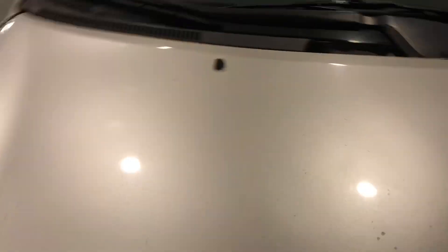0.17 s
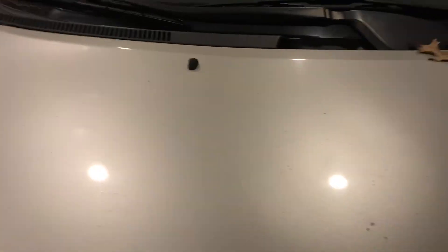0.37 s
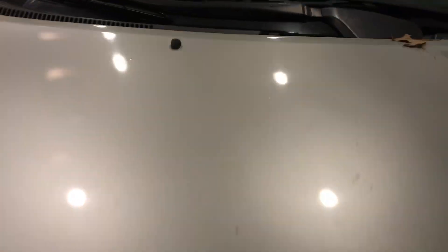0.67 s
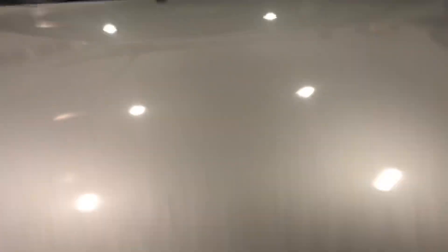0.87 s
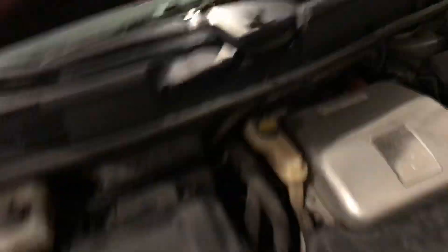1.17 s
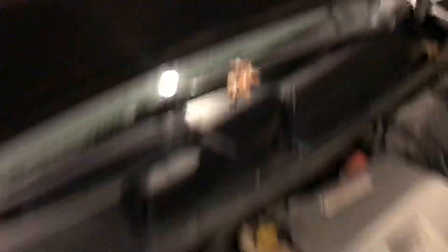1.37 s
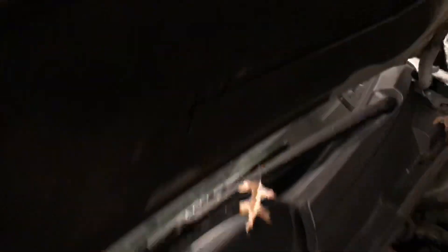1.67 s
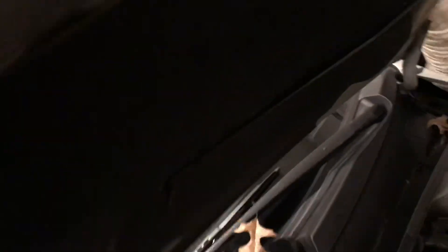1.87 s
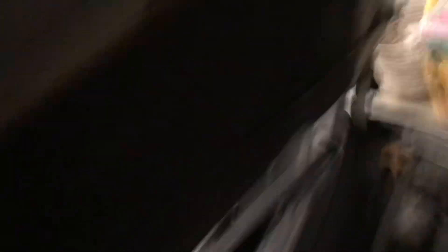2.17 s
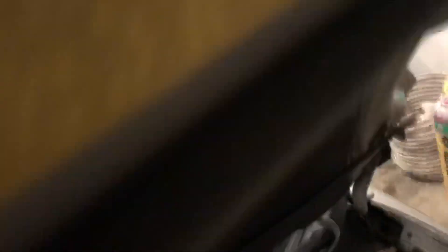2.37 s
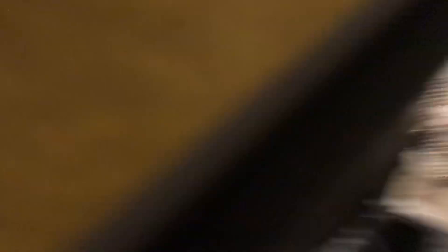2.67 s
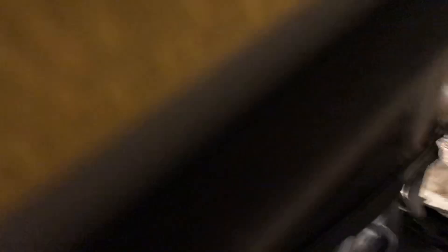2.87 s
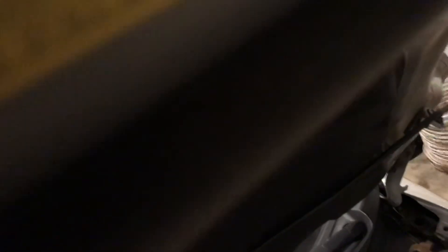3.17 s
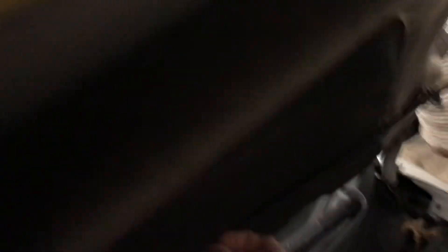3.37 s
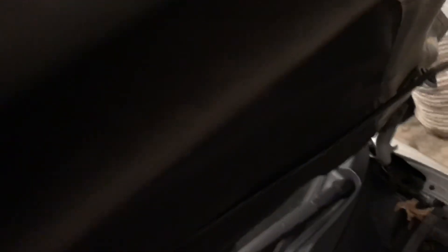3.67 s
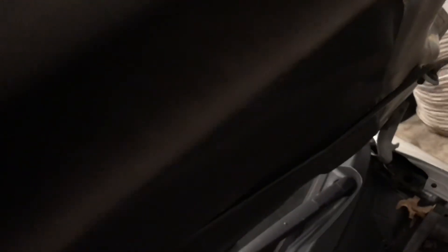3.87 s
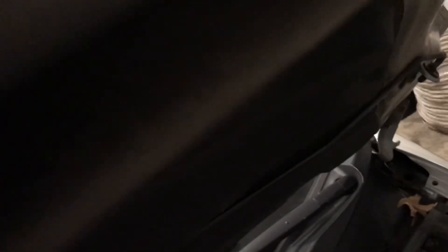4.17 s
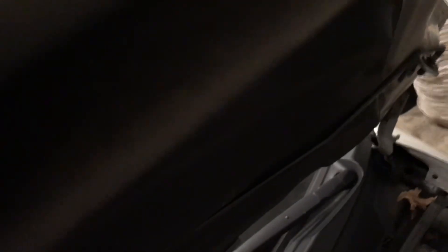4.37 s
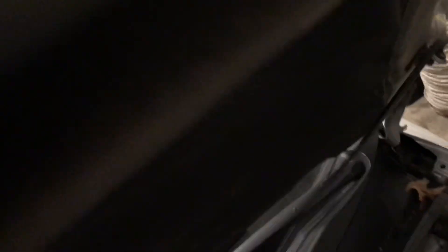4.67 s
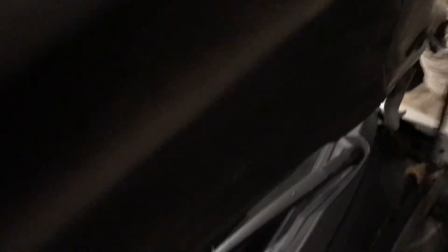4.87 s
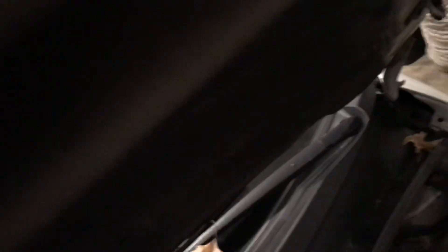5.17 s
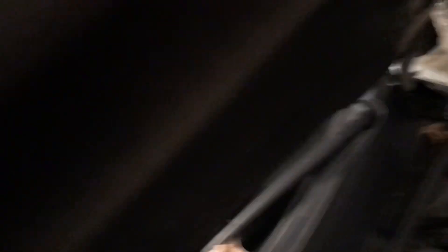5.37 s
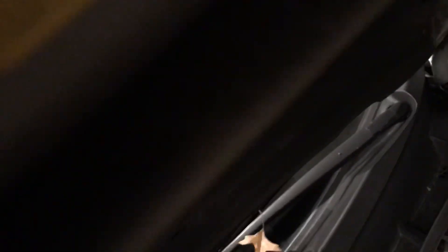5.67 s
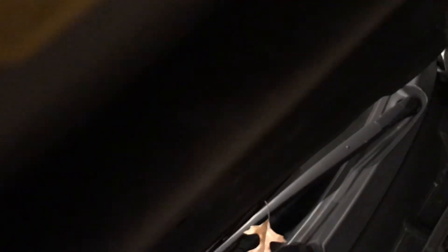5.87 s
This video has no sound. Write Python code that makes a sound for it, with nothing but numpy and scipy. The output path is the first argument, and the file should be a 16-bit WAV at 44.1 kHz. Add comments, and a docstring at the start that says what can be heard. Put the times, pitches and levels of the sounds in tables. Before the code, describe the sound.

Close up in a quiet garage, a car hood latch snaps, cloth rustles, small parts tick, then the sheet metal knocks and clunks loudly.

```python
"""In a quiet garage, a car hood is unlatched, lifted and propped, close to a hand-held phone.
Impulsive contacts excite decaying modes: the latch snaps and buzzes, the prop rod knocks on the panel.
Friction makes the rest: tiny slips give sleeve rustle, short hissing swishes and dragging; a hand rubs.
Bright noise bursts tick, sagging sines and lumpy low noise are the hand jolting the phone,
and random echoes with filtered noise give the garage its short tail and dull hush."""
import sys
import numpy as np
from scipy import signal
from scipy.fft import rfft, irfft
from scipy.io import wavfile
from scipy.ndimage import uniform_filter1d

SR = 44100
rng = np.random.default_rng(int(sys.argv[2]) if len(sys.argv) > 2 else 0)


def dump(signal):
    """Clip the signal to [-1, 1] and save it as 16-bit WAV at the path in sys.argv[1]."""
    limited = np.clip(np.atleast_2d(signal).T, -1, 1)
    pcm = np.round(limited * 32767).astype(np.int16)
    wavfile.write(sys.argv[1], SR, pcm)


N = 265085  # samples, about 6 s
# Levels in dB are those in the mix ahead of the microphone; spectra are relative.


def gain_of(db):
    """Decibel law: 20 dB is a factor of ten in amplitude."""
    return 10 ** (np.asarray(db) / 20)


def evened(x):
    """Normalization by effective value: scales to an RMS of one."""
    return x / np.sqrt(np.mean(x ** 2) + 1e-20)


def read(points, hz):
    """Logarithmic frequency scale: interpolates a curve evenly per octave."""
    point_hz, value = np.transpose(points)
    return np.interp(np.log(hz + 1), np.log(point_hz + 1), value)


def along(curve, t):
    """Time envelopes: interpolates each column of a curve linearly in time."""
    point_s, *columns = np.transpose(curve)
    return [np.interp(t, point_s, column) for column in columns]


def add(mix, start_s, sound):
    """Superposition: adds a sound to the mix in place, cut at the end of the scene."""
    part = mix[round(start_s * SR):][:len(sound)]
    part += sound[:len(part)]


def shaped(x, field_db, size=256):
    """Time-varying filtering: weights the short-time spectrum by a dB field over (Hz, s)."""
    overlap = size * 3 // 4
    hz, t, spectrum = signal.stft(x, SR, nperseg=size, noverlap=overlap)
    weighted = spectrum * gain_of(field_db(hz[:, None], t))
    return signal.istft(weighted, SR, nperseg=size, noverlap=overlap)[1][:len(x)]


def near_db(hz, centre_hz, octave_db):
    """Selective excitation: level falls with the squared distance in octaves from one pitch."""
    return -octave_db * np.log2((hz + 20) / centre_hz) ** 2


def grains(per_s, spread_db, count=N):
    """Stick-slip friction: noise made of many tiny slips of uneven size at random instants."""
    size = gain_of(spread_db * np.minimum(rng.exponential(1, count), 5))
    slips = size * (rng.random(count) < per_s / SR)
    return evened(slips * rng.standard_normal(count))


def ringing(modes, damping, centre_hz, octave_db, t):
    """Modal decay with beating: each mode is a close pair whose strength varies from blow to blow."""
    hz, db, t60 = np.transpose(modes)[:, :, None]
    place_db, twin, phase = rng.standard_normal((3,) + hz.shape)
    decay_db = -60 * t / (t60 * damping)
    level = gain_of(db + 2 * place_db + near_db(hz, centre_hz, octave_db) + decay_db)
    twin_hz = hz * (1 + .03 * twin)
    pair = np.sin(2 * np.pi * hz * t) + .6 * np.sin(2 * np.pi * twin_hz * t + 2 * phase)
    onset = 1 - np.exp(-t * 1500)
    return (level * pair).sum(0) * onset


def struck(ring, contact_s, peak_db):
    """Impact excitation: a first touch and dying rebounds, convolved with the ring."""
    t = np.arange(2600) / SR
    size, chance = rng.standard_normal(len(t)), rng.random(len(t))
    rebounds = size * (chance < 700 / SR) * np.exp(-t / contact_s)
    force = rebounds + 1.2 * (t == 0)
    sound = signal.fftconvolve(force, ring)
    loudest = np.sqrt(uniform_filter1d(sound ** 2, size=441).max())  # RMS of the loudest 10 ms
    return gain_of(peak_db) * sound / loudest


# spectrum of the garage's background: pitch_hz [Hz], density_db [dB per Hz]
HUSH_SPECTRUM = [(15, -35), (25, -8), (208, 1.5), (296, -13), (726, -10.5), (854, -14.5), (1060, -9),
                 (1430, -11), (2900, -27), (8830, -21.5), (10400, -24), (15200, -19.5), (16500, -59)]
HUSH_DB = -48.5


def hush():
    """Stationary noise: steady air and far machinery as noise of a fixed dull spectrum."""
    noise = shaped(rng.standard_normal(N), lambda hz, u: read(HUSH_SPECTRUM, hz) + 0 * u, size=2048)
    return gain_of(HUSH_DB) * evened(noise)


# spectrum of rustle and swishes before tilt: pitch_hz [Hz], density_db [dB per Hz]
RUSTLE_SPECTRUM = [(470, 9), (800, 9), (908, -20), (1100, -16), (1510, 9.5), (2090, -2), (3480, -3),
                   (6890, -3.5), (7720, -9), (8980, -5), (15100, -15.5), (15900, -13), (16500, -46)]
# handling the hood: start_s [s], rustle_db [dB], panel_rub_db [dB], low_shaking_db [dB]
HANDLING = [(0.0, -53.5, -47.5, -45), (0.3, -35.5, -49, -49), (0.55, -50.5, -51, -46),
            (0.88, -44.5, -48, -44), (1.17, -47, -53, -51.5), (1.3, -52.5, -49, -39),
            (1.46, -44, -58.5, -37), (1.85, -44, -53, -81), (2.23, -48.5, -52.5, -58),
            (2.6, -47, -46, -44.5), (3.0, -57.5, -56.5, -58.5), (3.25, -52, -46, -43), (3.5, -61, -45, -45),
            (3.78, -39.5, -37, -37.5), (4.05, -66, -53.5, -41), (4.28, -50, -40, -37),
            (4.56, -48, -40.5, -46), (5.0, -50.5, -46.5, -39), (5.36, -58.5, -47, -41),
            (5.56, -42.5, -34, -37), (5.88, -62.5, -49, -42.5), (6.01, -67, -45.5, -57)]
RUSTLE_TILT_DB = 5.5  # per octave


def rustle():
    """Stick-slip of fibres: flickering bunches whose dull and bright parts come and go apart."""
    t = np.arange(N) / SR
    flicker_db = 1.9 * evened(uniform_filter1d(rng.standard_normal(N), size=350))
    # random patches over frequency and time
    patches = rng.standard_normal((129, N // 64 + 8))
    patches = uniform_filter1d(patches, size=40, axis=0)
    patches = evened(uniform_filter1d(patches, size=24, axis=1))

    def field(hz, u):
        colour_db = read(RUSTLE_SPECTRUM, hz) + RUSTLE_TILT_DB * np.log2(hz / 6000 + 0.013)
        return colour_db + 3.5 * patches[:, :len(u)]

    cloth = evened(shaped(grains(9000, 1.24), field))
    return cloth * gain_of(along(HANDLING, t)[0] + flicker_db)


# dense upper modes of the steel sheet, also heard in blows: pitch_hz [Hz], density_db [dB per Hz]
SHEET_SPECTRUM = [(120, -45), (200, 1), (416, -9), (529, -11), (763, -10.5), (1250, -9.5), (2170, -31),
                  (2560, -19), (3100, -42), (16000, -20)]


def drag():
    """Friction-driven vibration: slips of the rod and hand feed the sheet's middle modes."""
    t = np.arange(N) / SR
    slips = grains(4000, 1.5)

    def field(hz, u):
        return read(SHEET_SPECTRUM, hz) - 6.1 * np.log2(1 + hz / 1800) + 0 * u

    return evened(shaped(slips, field, size=1024)) * gain_of(along(HANDLING, t)[1])


# spectrum of low shaking: pitch_hz [Hz], density_db [dB per Hz]
SHAKING_SPECTRUM = [(12, -54), (20, -24), (40, 4), (60, -3), (123, 1.5), (156, -9), (184, -16), (400, -46),
                    (520, -61), (880, -120)]


def bumps():
    """Low-pass impulse noise: sparse uneven slips keep only their bass, as lumpy shaking."""
    t = np.arange(N) / SR
    lumps = shaped(grains(300, 3.1), lambda hz, u: read(SHAKING_SPECTRUM, hz) + 0 * u, size=4096)
    return evened(lumps) * gain_of(along(HANDLING, t)[2])


# ticks of small parts: start_s [s], peak_db [dB], tilt_db [dB per octave]
TICKS = [(0.0294, -24.5, -10), (0.2144, -27, -4), (0.717, -47, -4), (0.7892, -22.5, -5.5),
         (1.3438, -33.5, 3), (1.393, -35.5, -4), (1.424, -24, -1.5), (1.4335, -18.5, 1), (1.552, -35, -3),
         (1.59, -34, -4), (1.613, -24, -0.5), (1.662, -33, -9.5), (1.708, -34, -6), (1.759, -38, -4),
         (1.8921, -14.5, 0), (1.937, -27, -4), (1.991, -23, -3.5), (2.025, -17.5, -4), (2.071, -28, -7.5),
         (2.133, -32.5, -7), (2.463, -28, 1), (2.7688, -31.5, -6.5), (2.833, -30, 4), (2.85, -33, 1),
         (3.835, -26, -8), (4.085, -30, 4), (4.16, -24, 0), (4.467, -24.5, -5.5), (4.5179, -3, -6),
         (5.3761, -10.5, -7), (5.443, -28, -4), (5.5121, -26.5, -6.5), (5.592, -25, -12.5)]
# spectrum of a tick before tilt: pitch_hz [Hz], density_db [dB per Hz]
TICK_SPECTRUM = [(530, -34), (900, -8.5), (2410, -15.5), (3270, -6.5), (4950, -0.5), (7040, 4), (7660, 2.5),
                 (15200, 6), (15900, -1), (16500, -35)]
TICK_S = 0.003  # time constant of the decay


def tick(start_s, peak_db, tilt_db):
    """Transient noise burst: brief and bright, scaled to its strongest 0.4 ms."""
    t = np.arange(2048) / SR
    hz = np.fft.rfftfreq(len(t), 1 / SR)
    colour_db = read(TICK_SPECTRUM, hz) + tilt_db * np.log2(hz / 6000 + 0.0025)
    noise = irfft(rfft(rng.standard_normal(len(t))) * gain_of(colour_db))
    burst = noise * np.exp(-t / TICK_S) * (1 - np.exp(-t * 6000))
    strongest = np.sqrt(uniform_filter1d(burst ** 2, size=18).max())
    return start_s, gain_of(peak_db) * burst / strongest


FAINT_COUNT = 18
FAINT_DB, FAINT_SPREAD_DB, FAINT_TILT_DB = -43, 4, 4  # mean, spread either way, tilt per octave


def faint_ticks():
    """Random arrivals: rows of quiet ticks scattered evenly over the whole scene."""
    when, size = rng.random((FAINT_COUNT, 2)).T
    start_s = when * N / SR
    peak_db = FAINT_DB + FAINT_SPREAD_DB * (2 * size - 1)
    return [(s, db, FAINT_TILT_DB) for s, db in zip(start_s, peak_db)]


# the latch and its spring: start_s [s], peak_db [dB], contact_s [s],
# damping [factor on t60], centre_hz [Hz], buzz_db [dB over the ring]
SNAPS = [(.086, -38, .001, 0.056, 2030, -7), (.768, -40.5, 0.0058, 0.49, 2480, 6),
         (.785, -19.5, 0.002, 1.26, 1500, -4), (0.792, -24, 0.008, 1.07, 214, -15),
         (0.791, -31, 0.02, 1.36, 3040, -6), (1.875, -28, 0.0085, 1.45, 2980, 16),
         (1.931, -42, 0.012, 1.6, 3020, 21), (2.03, -36, 0.0047, 0.35, 1750, 9),
         (2.075, -42, 0.0089, 1.2, 1730, 3), (4.16, -34.5, 0.002, 0.27, 2440, -1)]
# modes of the latch: pitch_hz [Hz], level_db [dB], t60_s [s, before damping]
LATCH_MODES = [(197, 0, .2), (248, 0, .3), (463, -8, .15), (650, -6, .15), (730, -10, 1.3), (880, -9, .3),
               (1168, -10, .6), (1500, 6, .07), (1556, -10, .4), (1640, -5, .3), (1740, -3, .25),
               (1850, -5, .15), (2431, -8, .2), (2762, -9, .22), (2961, -5, .3), (3070, -7, .3),
               (3165, -4, .33), (3330, -10, .25), (3601, -10, .15)]


def snap(start_s, peak_db, contact_s, damping, centre_hz, buzz_db):
    """Modal resonance: the struck latch rings, with a loose noise buzz from its spring."""
    t = np.arange(SR // 2) / SR
    ring = ringing(LATCH_MODES, damping, centre_hz, 6.0, t)

    def buzz_field(hz, u):
        return near_db(hz, centre_hz, 2.3) - 60 * u / (.3 * damping)

    buzz = shaped(rng.standard_normal(len(t)), buzz_field)
    latch = evened(ring) + gain_of(buzz_db) * evened(buzz)
    return start_s, struck(latch, contact_s, peak_db)


# short hissing swishes: cloth strokes, and near 2 s the longer scrape of the ticking parts:
# start_s [s], length_s [s], level_db [dB, before the swell], tilt_db [dB per octave]
SWISHES = [(0.126, 0.13, -34, 7.5), (0.282, 0.089, -38.5, 6.5), (0.343, 0.066, -33.5, 8.5),
           (0.509, 0.044, -43, 7), (1.085, 0.051, -39.5, 3.5), (1.197, 0.094, -45.5, 3.5),
           (1.424, 0.043, -36, 11), (1.614, 0.029, -40, 5), (1.653, 0.031, -35.5, 6),
           (1.979, .028, -28.5, 7), (2.02, 0.025, -26, 8.5), (2.244, 0.032, -42, 9),
           (2.368, 0.067, -40.5, 11), (2.435, 0.072, -35.5, 12.5), (2.533, 0.09, -41.5, 4.5),
           (2.624, 0.089, -43, 9.5), (3.082, 0.042, -45, 21), (3.205, 0.1, -43.5, 1), (3.372, 0.11, -45, 3),
           (3.599, 0.068, -40.5, 4), (3.693, 0.076, -40, 7), (3.811, 0.057, -37, 3.5),
           (3.872, 0.049, -37.5, 2.5), (4.26, 0.16, -39, 2), (4.417, 0.048, -38.5, 0.5),
           (4.92, 0.046, -44, 11)]


def swish(start_s, length_s, level_db, tilt_db):
    """Stick-slip friction in one short hiss: a bunch of slips that swells and fades."""
    slips = grains(7000, 1.4, count=8192)
    t = np.arange(len(slips)) / SR

    def field(hz, u):
        return read(RUSTLE_SPECTRUM, hz) + tilt_db * np.log2(hz / 6000 + 0.0087) + 0 * u

    hiss = evened(shaped(slips, field))
    swell = abs(np.sin(np.pi * np.clip(t / length_s, 0, 1))) ** .8
    return start_s, gain_of(level_db) * hiss * swell


# a hand sliding over the paint and slowing: start_s [s], length_s [s],
# level_db [dB, before the swell], first_hz [Hz], last_hz [Hz]
RUB = (0.2, 0.5, -41.5, 4900, 3300)


def rub(start_s, length_s, level_db, first_hz, last_hz):
    """Sliding friction: smooth hiss around one broad resonance that sinks as the hand slows."""
    t = np.arange(SR * 3 // 4) / SR

    def field(hz, u):
        centre_hz = first_hz + (last_hz - first_hz) * np.clip(u / length_s, 0, 1)
        return near_db(hz, centre_hz, 12.0)

    hiss = evened(shaped(rng.standard_normal(len(t)), field))
    swell = abs(np.sin(np.pi * np.clip(t / length_s, 0, 1) ** 0.37))  # quick rise, slow fade
    return start_s, gain_of(level_db) * hiss * swell


# the hand jolting the phone and the hood swaying:
# time_s [s], level_db [dB, before rise and decay], pitch_hz [Hz, at the onset]
THUMPS = [(0.498, -25.5, 91.3), (0.707, -27, 74.6), (1.292, -30.5, 109), (1.308, -26, 45.7),
          (1.417, -22, 56), (1.599, -33, 46.3), (2.056, -30, 83), (2.232, -29.5, 68), (2.461, -32, 67),
          (2.748, -26.5, 50), (3.227, -14, 75.4), (3.619, -28, 82.5), (3.766, -18.5, 83), (3.898, -26, 60),
          (4.095, -23, 103), (4.159, -21.5, 72), (4.301, -31, 97), (4.535, -28, 80.5), (4.561, -10, 106.6),
          (4.889, -43, 40.4), (5.387, -30, 66.4), (5.42, -20, 58)]
THUMP_T60_S, THUMP_T60_S_PER_DB = .38, .006  # t60 of a 0 dB jolt; softer ones die sooner


def thump(time_s, level_db, pitch_hz):
    """Damped oscillation: a soft low push that sags in pitch, begun 8 ms before its listed time."""
    t = np.arange(SR // 3) / SR
    t60 = max(THUMP_T60_S + THUMP_T60_S_PER_DB * level_db, .12)
    envelope = gain_of(level_db - 60 * t / t60) * (1 - np.exp(-t / 0.0049))
    sagging = np.sin(2 * np.pi * pitch_hz * t * (1 - 1.04 * t))
    return time_s - .008, envelope * sagging


# blows on the panel: start_s [s], clang_db [dB], thud_db [dB], clang_hz [Hz], thud_hz [Hz],
# damping [share of the free t60 left by the holding hand]
BLOWS = [(0.494, -34.5, -23, 730, 169, 0.58), (2.048, -43, -42.5, 1560, 315, 0.85),
         (2.249, -43, -41.5, 1280, 161, .45), (3.208, -33, -24, 767, 294, 1),
         (3.241, -34, -15.5, 790, 219, 0.37), (3.382, -39.5, -43, 900, 231, 0.35),
         (3.441, -31.5, -26, 960, 280, .6), (3.601, -40.5, -43, 830, 291, 0.77),
         (3.624, -33.5, -29, 526, 339, 0.78), (3.738, -26.5, -29, 790, 230, .6),
         (3.756, -45, -16, 729, 193, 0.34), (3.845, -31, -30, 705, 221, 0.73),
         (3.884, -30.5, -30, 735, 330, 0.34), (3.92, -46, -32, 1280, 207, 0.49),
         (4.086, -33, -18, 530, 228, 0.3), (4.108, -39, -18.5, 498, 195, 0.52),
         (4.149, -42, -24, 478, 207, .8), (4.306, -34, -28, 1110, 180, 0.51),
         (4.442, -39.5, -33, 587, 245, 0.92), (4.519, -2.5, -9.5, 1380, 324, 0.59),
         (4.527, -14.5, -6.5, 600, 252, 0.63), (4.544, -16, -7.5, 552, 207, 0.75),
         (4.645, -25, -18.5, 584, 240, 0.45), (4.875, -27.5, -22.5, 593, 207, 0.77),
         (5.065, -43.5, -31, 675, 149, 1.0), (5.376, -16, -13, 900, 250, 0.51),
         (5.39, -19.5, -18.5, 1260, 342, 1), (5.45, -30.5, -24.5, 1110, 337, 1),
         (5.511, -29.5, -23.5, 900, 350, 0.36), (5.557, -44, -41, 576, 350, 0.63),
         (5.591, -13.5, -21, 1700, 431, 0.55), (5.603, -16.5, -16.5, 1000, 412, 0.22),
         (5.756, -32, -26, 656, 357, 0.57), (5.821, -37.5, -39, 483, 150, 0.62)]
# modes of the panel: pitch_hz [Hz], level_db [dB], t60_s [s, free]
PANEL_MODES = [(100.4, -1.5, 0.29), (159.8, -4.5, 0.2), (207, -2.5, 0.25), (239.4, -3, 0.24),
               (265.3, -0.5, 0.19), (332, -2.5, 0.35), (417, -19, 0.23), (512.7, 1, 0.16), (576.6, 4, 0.14),
               (670.6, 3, 0.15), (738, -5.5, 0.13), (860, -8, 0.082), (888, -5.5, 0.096), (935, 4, 0.2),
               (1026, -6, 0.088), (1170, -3.5, 0.11), (1238, 6.5, 0.14), (1343, -2, 0.16),
               (1512, -19, 0.67), (1506, -21, 0.19), (1830, -3.5, 0.086), (2080, -17, 0.32),
               (2520, -2, 0.092)]
# free decay of the dense sheet modes: pitch_hz [Hz], t60_s [s]
SHEET_T60 = [(300, 0.65), (1200, 0.18), (3000, 0.11), (8000, 0.16), (15000, .08)]
SHEET_DB = 1.5  # over the separate clang modes
# rebound decay for a 0 dB clang, and the dB of softening that doubles it
CONTACT_S, CONTACT_DOUBLING_DB = 0.0034, 17.5
# the crack over the clang modes at 0 dB, and its further fall per dB of softening
CRACK_DB, CRACK_PER_DB = -3, 0.56
SPLIT_HZ = 430  # thud modes below, clang modes above


def blow(start_s, clang_db, thud_db, clang_hz, thud_hz, damping):
    """Modal impact: low modes thud, high modes and dense sheet clang; hard contacts are short and crack."""
    t = np.arange(SR // 3) / SR
    contact_s = CONTACT_S * 2 ** (-clang_db / CONTACT_DOUBLING_DB)
    low_modes = [mode for mode in PANEL_MODES if mode[0] < SPLIT_HZ]
    high_modes = [mode for mode in PANEL_MODES if mode[0] >= SPLIT_HZ]
    thud = ringing(low_modes, damping, thud_hz, 11.7, t)
    ring = ringing(high_modes, damping, clang_hz, 5.0, t)

    def sheet_field(hz, u):
        decay_db = -60 * u / (read(SHEET_T60, hz) * damping)
        return read(SHEET_SPECTRUM, hz) + near_db(hz, clang_hz, 1.0) + decay_db

    sheet = shaped(rng.standard_normal(len(t)), sheet_field)
    band = signal.butter(1, [1800, 6500], "band", fs=SR)
    crack = signal.lfilter(*band, rng.standard_normal(len(t))) * np.exp(-t / 0.0093)
    crack_gain = gain_of(CRACK_DB + CRACK_PER_DB * clang_db)
    clang = evened(ring) + gain_of(SHEET_DB) * evened(sheet) + crack_gain * evened(crack)
    return start_s, struck(clang, contact_s, clang_db) + struck(thud, contact_s, thud_db)


# reverberation of the garage: pitch_hz [Hz], t60_s [s]
GARAGE_T60 = [(100, 0.64), (500, 0.44), (2000, 0.26), (6000, 0.21), (14000, 0.069)]
GARAGE_DB = -16  # gain of the tail


def garage(x):
    """Reverberation: echoes of random sign from about 9 ms on, each band dying at its own speed."""
    taps = np.zeros(SR)
    slots = np.arange(400, SR - 20, 20)  # one echo in every 20 samples
    taps[slots + rng.integers(0, 20, len(slots))] = rng.choice([-1., 1.], len(slots))
    tail = shaped(taps, lambda hz, u: -60 * u / read(GARAGE_T60, hz), size=512)
    return signal.fftconvolve(x, tail / np.linalg.norm(tail))[:N]


def scene():
    """Superposition: contact and friction sounds excite the garage; shaking and hush stay dry."""
    near, shaking = rustle() + drag(), bumps()
    all_ticks = TICKS + faint_ticks()
    for play, rows in ((tick, all_ticks), (snap, SNAPS), (swish, SWISHES), (rub, [RUB]), (blow, BLOWS)):
        for row in rows:
            add(near, *play(*row))
    for row in THUMPS:
        add(shaking, *thump(*row))
    return (near + gain_of(GARAGE_DB) * garage(near) + shaking + hush())[None]


# response of the microphone's port and case: pitch_hz [Hz], gain_db [dB]
MIC_RESPONSE = [(3000, 0), (6000, -10.5), (7700, -11.5), (9000, -12.5), (10600, -16), (12000, -10),
                (15000, -8.5)]
EDGE_HZ = 16000  # upper band limit


def record(dry):
    """Transducer response: treble colour, loss of deep bass, soft saturation, then a band limit."""
    hz = np.linspace(0, SR / 2, num=129)
    port = signal.firwin2(129, hz, gain_of(read(MIC_RESPONSE, hz)), fs=SR)
    coloured = signal.oaconvolve(dry, port[None], "same")
    coloured = signal.sosfilt(signal.butter(3, 38, "high", fs=SR, output="sos"), coloured)
    held = np.tanh(coloured / 1.34) * 0.91
    band_limit = signal.firwin(151, EDGE_HZ, window=("kaiser", 9), fs=SR)
    return signal.oaconvolve(held, band_limit[None], "same")


dry = scene()
out = record(dry)
dump(out)
```